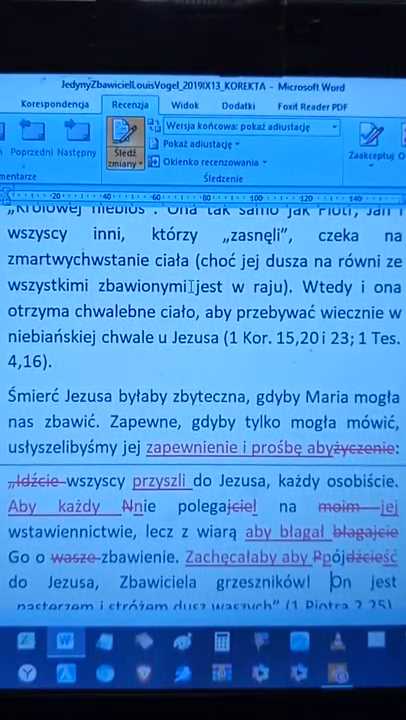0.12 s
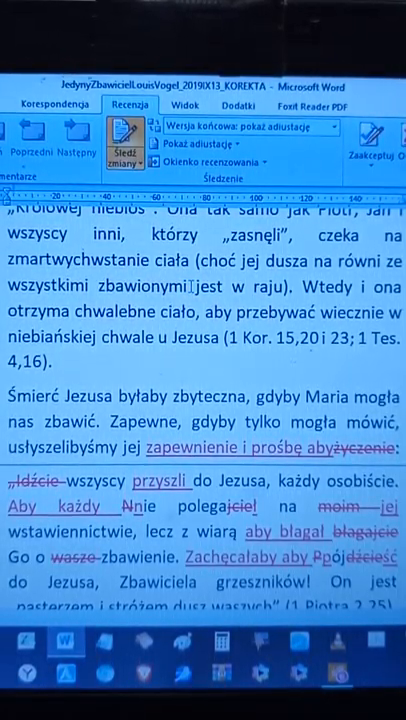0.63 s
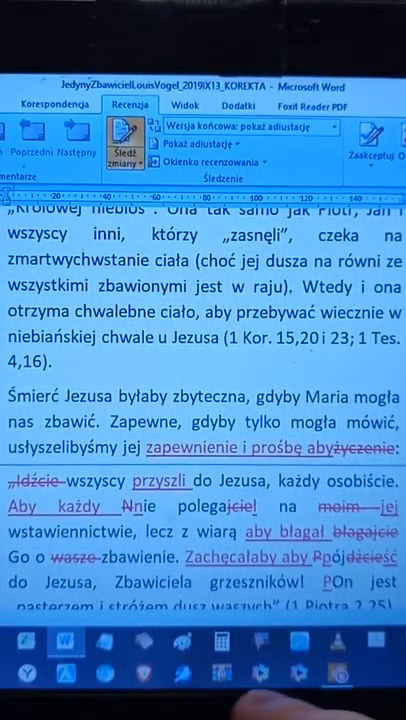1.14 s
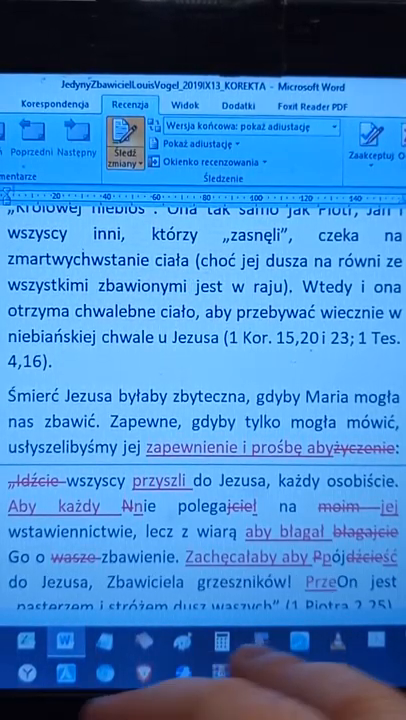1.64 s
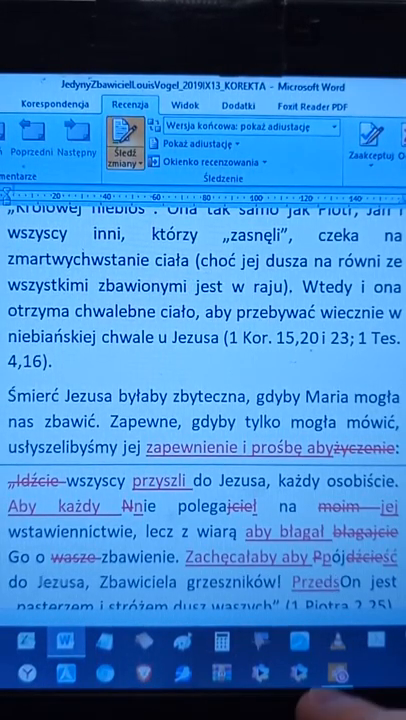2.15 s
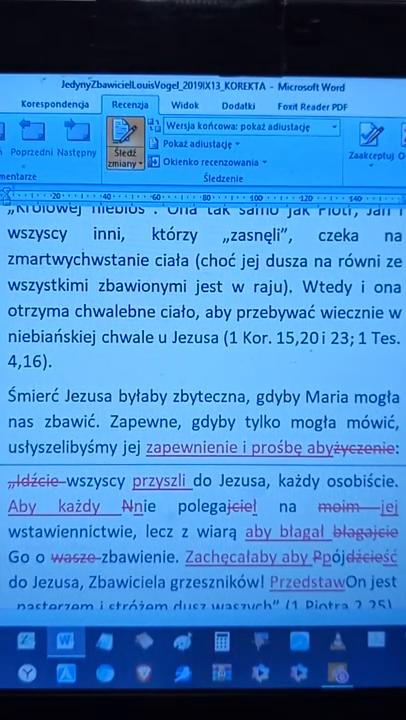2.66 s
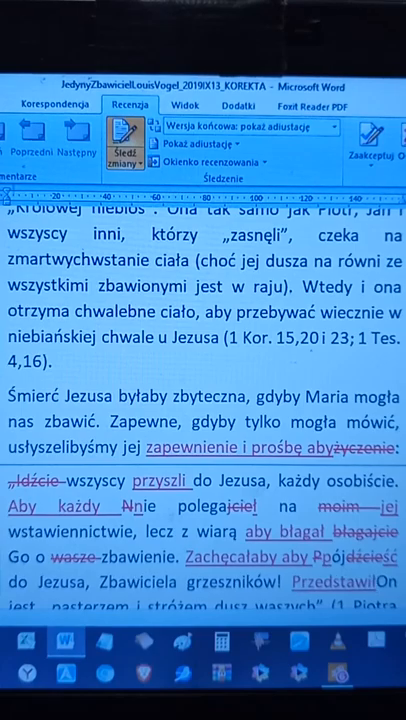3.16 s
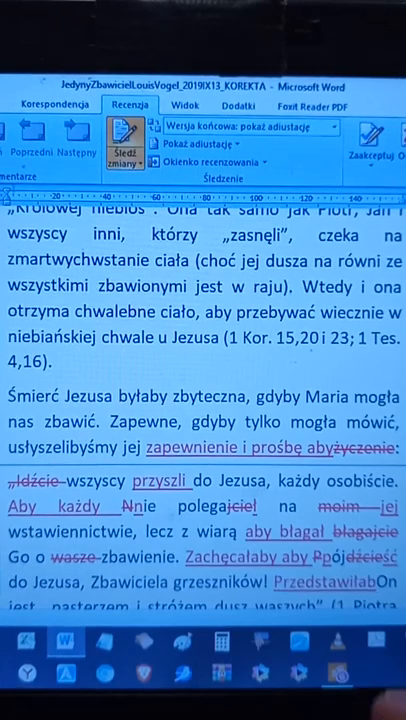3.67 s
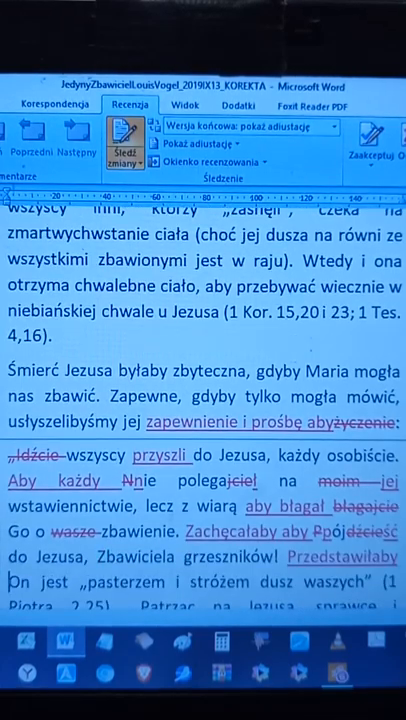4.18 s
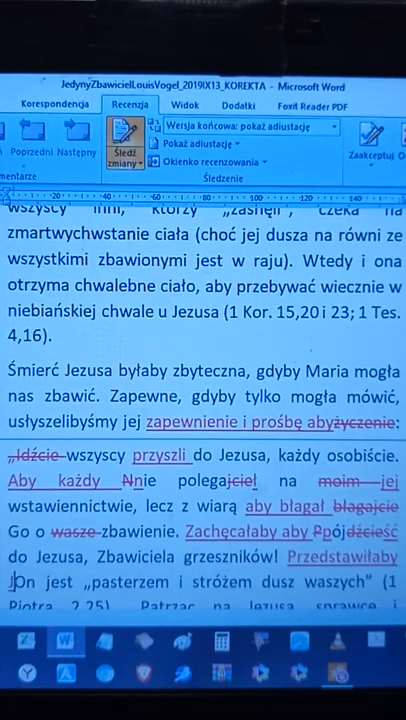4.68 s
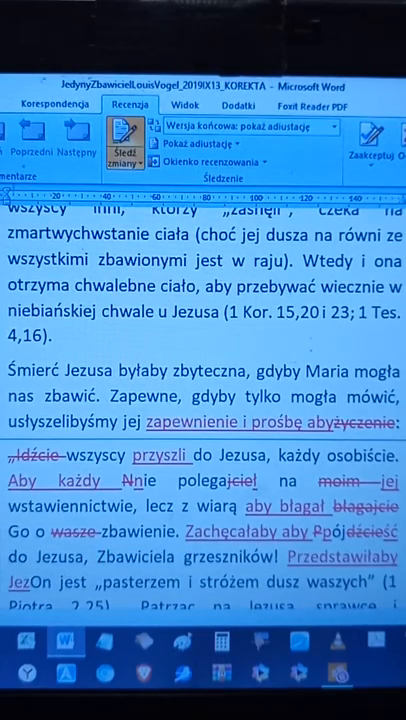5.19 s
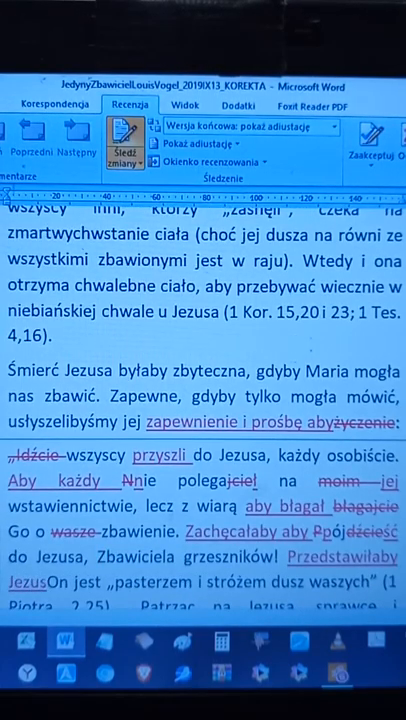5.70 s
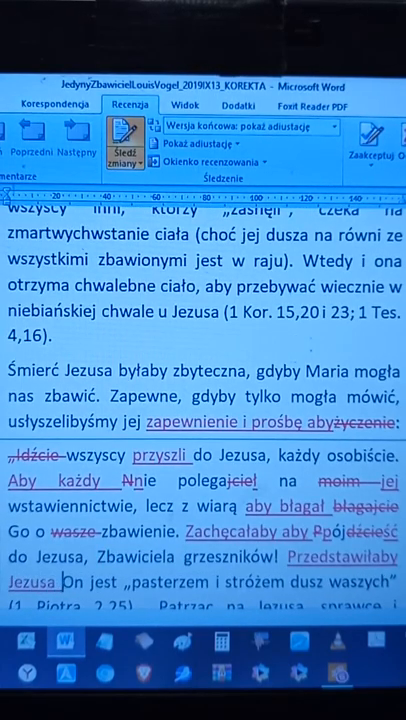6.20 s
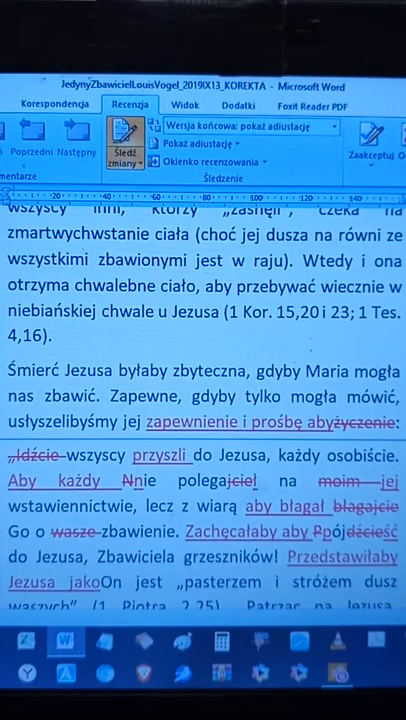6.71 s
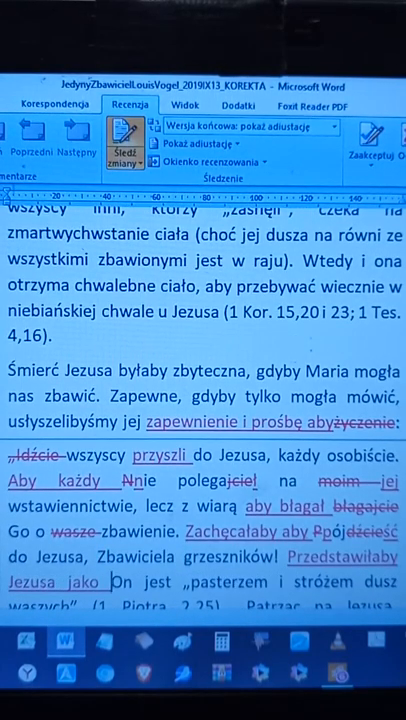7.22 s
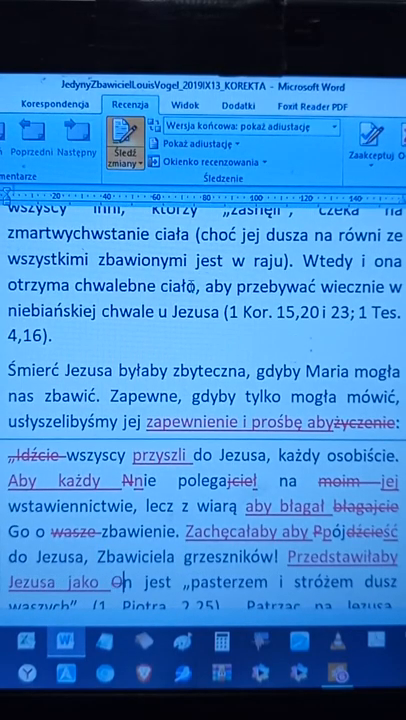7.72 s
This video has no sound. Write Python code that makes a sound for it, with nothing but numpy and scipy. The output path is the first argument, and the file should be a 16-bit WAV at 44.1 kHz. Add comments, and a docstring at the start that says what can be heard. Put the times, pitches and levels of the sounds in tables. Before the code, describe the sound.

Close, dry typing: light, crisp key clicks with dull woody bumps from the case and desk underneath. The rhythm is quick but irregular, with small gaps between strokes and occasional harder snaps. Very little echo, just a short room tail. A faint wavering fan hum and soft hiss stay steady behind it, exposed at the start and again when the typing thins to almost nothing.

```python
"""Fingers type an uneven run on a flat computer keyboard, the microphone on the same desk.
Each key gives short plastic clicks as it is touched, bottoms out and springs back: noise bursts
filtered by keycap resonances. Each push thuds into case and desk, a sum of damped sines, and
buzzes loose keys, noise on the swing of the desk. A fan hums faintly as wavering sines over the
shaped-noise hiss of a quiet room; sparse taps give the clicks a short room tail."""
import sys
import numpy as np
from scipy import signal
from scipy.fft import rfft, irfft
from scipy.io import wavfile
from scipy.ndimage import uniform_filter1d

SR = 44100
rng = np.random.default_rng(int(sys.argv[2]) if len(sys.argv) > 2 else 0)


def transcribe(signal):
    """Save signal, clipped to [-1, 1], as a 16-bit WAV file at the path in sys.argv[1]."""
    frames = np.atleast_2d(signal).T
    limited = np.clip(frames, -1, 1)
    pcm = np.round(limited * 32767).astype(np.int16)
    wavfile.write(sys.argv[1], SR, pcm)


def undo_db(level):
    """Turn decibels back into plain size, where 20 dB means ten times bigger."""
    steps = np.asarray(level, float) / 20
    return 10 ** steps


N = 346626

# Tones of the fan. Each row: frequency in Hz, rms level in dB before waver.
FAN_TONES = [(479, -75), (430, -87)]
# Spectrum of the steady hiss. Each row: frequency in Hz, relative density in dB per Hz.
HISS_SPECTRUM = [(25, -31), (55, -14), (140, -13), (370, -19), (480, -16), (600, -24.5), (1000, -26.5),
                 (3000, -31.5), (6500, -34), (7600, -41.5), (13500, -43.5), (14600, -40.5), (16900, -26),
                 (17200, -70)]
# Key clicks. Each row: start in seconds, relative level in dB, body against middle in dB,
# own ring of this keycap in Hz, length scale of the blow in ms.
CLICKS = [(0.4432, -58, -47, 7400, 0.53), (0.504, -56, -1.5, 7940, 5.6), (0.674, -50, 1, 5850, 8.7),
          (0.6814, -45.5, 14, 2620, 2.2), (0.6938, -51, 3.5, 3480, 0.5), (0.7092, -52.5, 11, 3340, 6),
          (0.7192, -61.5, 5, 3320, 24), (.743, -70, -8, 7000, 2), (0.761, -55.5, -20, 8300, 5.4),
          (0.766, -58.5, 0, 8950, 5.5), (1.224, -52, 3.5, 4100, 1.3), (1.2287, -44, 0.5, 3100, 2.4),
          (1.3147, -61.5, -4, 2660, 2.8), (1.3371, -51.5, 0.5, 6400, 1.7), (1.3508, -52, 7, 1280, 2.8),
          (1.3674, -53, 8, 4030, 3.9), (1.4286, -52, -8, 5370, 4.2), (1.4868, -51, -2, 7850, 1.3),
          (1.4918, -52.5, -8, 7300, 3.3), (1.56, -67.5, 1, 5740, 3), (1.7288, -57.5, -34, 7150, 2.8),
          (1.746, -58.5, -7, 7000, 2.5), (1.8312, -64, 1, 6300, 3.1), (1.9584, -57.5, -5.5, 5900, 1.03),
          (1.983, -65.5, 6, 6950, 2.4), (2.051, -66.5, -25, 6260, 11), (2.089, -44, -8, 6600, 3),
          (2.0941, -46, 11.5, 6500, 3), (2.2467, -51.5, -5, 6250, 0.8), (2.2597, -48.5, 8.5, 4030, 7.2),
          (2.3437, -65, -3, 2450, 7.5), (2.5298, -57.5, -2, 5500, 7.6), (2.544, -66, -6, 3470, 2.8),
          (2.6191, -61, -5, 3470, 0.72), (2.6602, -51, -3, 6500, 6.2), (2.667, -53, 1, 2330, 5.2),
          (2.7354, -53.5, -1, 6300, 4.4), (2.8733, -49.5, -8.5, 5800, 10.3), (2.888, -59, 0, 6500, 3),
          (2.8962, -62, 8, 4610, 6.5), (3.0035, -49, -12, 10400, 2.9), (3.0106, -47, 22, 1770, 1.34),
          (3.086, -64.5, 4, 9100, 2.3), (3.0979, -62, -4, 4330, 1.4), (3.1075, -62, 0, 4300, .9),
          (3.1986, -52.5, -13, 4100, 0.66), (3.212, -52, 1, 4000, 0.91), (3.273, -57.5, -6, 6540, 0.24),
          (3.31, -57, -6, 6800, 0.33), (3.4694, -46, -22, 3800, 4.5), (3.477, -56, -14, 3500, 3.8),
          (3.5463, -58.5, -24, 7100, 3.1), (3.5532, -60, -10, 7200, 5), (3.6831, -49, -1, 3270, 2.8),
          (3.69, -49.5, -8, 3120, 1.8), (3.7771, -37.5, -6, 5200, 4), (3.7832, -31.5, -4, 5600, 2.5),
          (3.798, -55, 5, 3000, 3), (3.854, -69, -17, 8250, 4.1), (3.867, -53, -24, 5970, 9.8),
          (3.8714, -48.5, -11, 5200, 0.83), (4.0407, -53, -32, 7360, 7.9), (4.0493, -54.5, -10, 7950, 3.6),
          (4.2882, -48.5, -6, 5000, 8.7), (4.373, -62, -9, 6050, 0.98), (4.3933, -48, -14, 3700, 5.6),
          (4.6585, -53, -17, 5100, 1.7), (4.6648, -61, 5, 2260, 11), (4.7505, -64.5, 3, 5630, 2),
          (4.7568, -64, 5, 7450, 2.3), (5.029, -48.5, -17, 3570, 2.7), (5.04, -56.5, 0, 6400, 5.4),
          (5.0584, -51, 5, 3120, 2), (5.0738, -54.5, 20, 3040, 3.1), (5.129, -59, 2, 6600, 2),
          (5.4374, -47.5, -4.5, 6230, 4.6), (5.4428, -45.5, 0.5, 6500, 3.3),
          (5.5696, -53.5, -17, 4500, 4.8), (5.5807, -58, 5, 6300, 0.83), (5.599, -62, 10, 3100, 2.8),
          (5.662, -63, -14, 4230, 18), (5.6717, -59.5, 2, 3070, 3.1), (5.7888, -53.5, -1, 6460, 1.5),
          (5.804, -51, 0, 1260, 1.1), (5.809, -65, -9, 5400, 3), (5.8233, -44, -4.5, 6600, 1.8),
          (5.8827, -34.5, -9, 5800, 2.4), (5.8928, -44, -1.5, 6520, 2), (5.969, -68.5, -7, 8000, 1.7),
          (6.001, -52.5, -18, 4530, 4.1), (6.0101, -60, -27, 3580, 2), (6.1655, -44.5, -47, 10800, 0.78),
          (6.173, -57.5, -1, 1630, 6.4), (6.2447, -62.5, 0, 8700, 4.9), (6.302, -47, -16, 6650, 2.9),
          (6.3107, -48, 10, 2940, 3.5), (6.3294, -53.5, 12, 3160, 1.3), (6.398, -45, -13, 3800, 4.1),
          (6.4076, -47.5, 6, 1580, 3.8), (6.479, -63.5, 3, 3970, 2.2), (6.6013, -55.5, -6, 11300, 3.2),
          (6.6079, -48, 5.5, 1180, 2.5), (6.716, -64.5, 2, 3250, 1.5), (6.821, -34, -12, 6500, 3.2),
          (6.8291, -34.5, 4, 6270, 4.8), (6.892, -64, -19, 7200, 1), (6.918, -49, -15, 7660, 3.9),
          (6.9269, -51, -11, 6900, 1.1), (7.279, -71, -6, 5780, 5.4), (7.8329, -61, -13.5, 9700, 1.8),
          (7.846, -65, 7, 8940, 1.8)]
# Centres of the body, middle and edge of a click, in Hz.
CLICK_BANDS_HZ = 1500, 5000, 10000
# Resonances shared by all keys. Each row: centre in Hz, width in Hz, relative level in dB.
KEYCAP_MODES = [(1248, 87, 11.5), (1595, 120, 5), (2300, 73, -6), (3100, 83, -14.5), (3990, 93, -4),
                (5470, 107, -6), (6500, 500, 1), (7310, 280, -11.5), (8440, 720, -17), (9950, 610, -2.5),
                (17300, 1100, -21)]
# Overall colour of a click, resonances included. Each row: frequency in Hz, gain in dB.
RATTLE_COLOUR = [(500, 7), (900, -9.5), (3000, 6), (7000, -1), (12000, -4), (13500, -11), (14500, -6),
                 (17000, 5.5), (18300, -32), (19200, -42)]
# Decay of the room. Each row: frequency in Hz, t60 in seconds.
ROOM_DECAY = [(700, 0.47), (3000, 0.12), (7000, 0.04), (9000, 0.027), (16000, 0.031)]
# Pushes into case and desk. Each row: start in seconds, boom in dB, thud in dB, knock in dB.
PUSHES = [(0.675, -47, -33.5, -45.5), (0.752, -60, -49.5, -56), (0.787, -56.5, -57, -63),
          (1.233, -54, -34, -39.5), (1.318, -48, -42, -57.5), (1.351, -48.5, -35.5, -50),
          (1.42, -47.5, -49.5, -70), (1.497, -51.5, -31.5, -42), (1.555, -51, -38, -68),
          (1.6, -71, -50, -63), (1.742, -52, -42, -74), (1.824, -55, -49.5, -83), (1.98, -60.5, -56, -59),
          (2.053, -56, -52, -68), (2.102, -54, -33, -37.5), (2.178, -52.5, -46, -67),
          (2.262, -53.5, -47.5, -68), (2.343, -58.5, -60.5, -74), (2.537, -50.5, -44.5, -63),
          (2.609, -58.5, -65, -68), (2.668, -52.5, -33.5, -69), (2.736, -53, -50.5, -75),
          (2.889, -46, -41, -54), (3.011, -48.5, -38.5, -42), (3.103, -47.5, -68, -62),
          (3.209, -48, -43, -64), (3.305, -54, -55, -70), (3.351, -65, -73, -65),
          (3.478, -41.5, -35.5, -51), (3.544, -47, -40.5, -68), (3.693, -48, -34, -41),
          (3.783, -43.5, -32, -33), (3.866, -49, -43, -52), (3.942, -65, -58, -81), (4.091, -68, -59, -83),
          (4.296, -46, -32.5, -51.5), (4.369, -52.5, -42.5, -74), (4.671, -48.5, -44.5, -59),
          (4.758, -55.5, -52.5, -80), (5.038, -43.5, -38, -69), (5.446, -51.5, -31.5, -47),
          (5.504, -65, -44, -74), (5.578, -48.5, -41, -57), (5.673, -51, -52, -77), (5.8, -55, -50, -61),
          (5.891, -40, -38, -38), (5.998, -50, -58, -62), (6.172, -45, -40.5, -74),
          (6.245, -54.5, -48, -73), (6.309, -47, -42.5, -47.5), (6.407, -39, -35.5, -42),
          (6.612, -51.5, -43, -57), (6.731, -63, -62, -87), (6.827, -42.5, -32.5, -39.5),
          (6.918, -49.5, -43.5, -55.5), (7.645, -59, -88, -86)]
# Modes of case and desk: boom below 130 Hz, knock above 260 Hz, thud between.
# Each row: frequency in Hz, relative level in dB, t60 in seconds, rise time constant in ms.
DESK_MODES = [(58.4, -9, 0.49, 12), (91.76, 5.5, 0.21, 24), (97.87, 13, 0.22, 5.6), (151.5, 3, 0.13, 3.9),
              (181.95, -1, 0.22, 4.5), (250.2, -2, 0.11, 11.7), (291, 1.5, 0.056, 0.99),
              (353, -3, 0.049, 1.2), (438.3, 1, 0.091, 1.1), (582, -1, 0.054, 2), (667, -10, 0.072, 0.75)]
# Colour of loose keys shaken by a push. Each row: frequency in Hz, gain in dB.
CHATTER_COLOUR = [(600, 10.5), (1200, 3.5), (3200, -3), (4500, -2), (6500, -6.5), (8500, -34), (13500, -30),
                  (16500, 13.5), (17300, -60)]


def evened(x):
    """Scales to rms 1."""
    return x / np.sqrt(np.mean(x ** 2) + 1e-20)


def read(points, hz):
    """Reads a spectrum on a log-frequency axis."""
    f, value = np.transpose(points)
    return np.interp(np.log(hz + 1), np.log(f + 1), value)


def add(mix, start_s, sound):
    """Mixes a sound in at start_s, cut at the end of the mix."""
    part = mix[round(start_s * SR):][:len(sound)]
    part += sound[:len(part)]


def background(hiss_db=-69.5, waver_db=3.0, waver_hz=2.47):
    """Steady hiss of room and microphone, and fan tones that waver in level and pitch."""
    hz = np.fft.rfftfreq(N, 1 / SR)
    hiss = irfft(rfft(rng.standard_normal(N)) * undo_db(read(HISS_SPECTRUM, hz)), N)
    out = undo_db(hiss_db) * evened(hiss)

    def slow_noise():
        """Random drift of rms 1, mostly below 6 Hz."""
        return evened(irfft(rfft(rng.standard_normal(N)) / (1 + (hz / 6) ** 2), N))

    for tone_hz, tone_db in FAN_TONES:
        level_drift, pitch_drift = slow_noise(), slow_noise()
        phase = 2 * np.pi * np.cumsum(tone_hz + waver_hz * pitch_drift) / SR
        out += undo_db(tone_db + waver_db * level_drift) * np.sqrt(2) * np.sin(phase)
    return out


def clicks(own_db=13, own_q=14, shared_db=9, detune=0.059, cap_scatter_db=3.0,
           tail_db=-20, tail_ms=13, lead_db=-27, lead_ms=3,
           edge_db=2, edge_db_per_octave=2, edge_scatter_db=4, scrape_top_hz=9100):
    """A short rattle of plastic on plastic rings the keycap; every click is tuned a little apart."""
    size, early = 4096, 1024  # samples per click, samples ahead of its start
    ms = (np.arange(size) - early) * 1000 / SR
    hz = np.fft.rfftfreq(size, 1 / SR)
    out = np.zeros(N)
    noises = rng.standard_normal((len(CLICKS), size))
    cap_luck = rng.standard_normal((len(CLICKS), len(KEYCAP_MODES), 2))
    edge_luck = rng.standard_normal(len(CLICKS))
    for row, noise, luck, edge_chance in zip(CLICKS, noises, cap_luck, edge_luck):
        start_s, level_db, body_db, ring_hz, length_ms = row
        late = ms / max(length_ms, .3) - .3
        blow = np.exp(-(late / np.where(late < 0, .25, .6)) ** 2)  # rises faster than it falls

        # the key scrapes its guide just before the blow and chatters after it, the heavy ones most
        lead = undo_db(lead_db) * np.exp(ms / lead_ms)
        tail = undo_db(tail_db + 0.34 * body_db) * np.exp(-ms / tail_ms)
        faint = undo_db(-.3 * (level_db + 38.5))  # hard blows stand out further from their scrape
        scrape = faint * np.where(ms < 0, lead, tail)

        ring = undo_db(own_db) / (1 + 2j * own_q * (hz / ring_hz - 1))
        for (mode_hz, width_hz, mode_db), (pitch_chance, level_chance) in zip(KEYCAP_MODES, luck):
            tuned_hz = mode_hz * (1 + detune * pitch_chance)
            gain = undo_db(shared_db + mode_db + cap_scatter_db * level_chance)
            ring = ring + gain / (1 + 2j * (hz - tuned_hz) / width_hz)

        # a cap that rings higher clicks brighter
        octaves = np.log2(ring_hz / CLICK_BANDS_HZ[1])
        bright_db = edge_db + edge_db_per_octave * octaves + edge_scatter_db * edge_chance
        bands = list(zip(CLICK_BANDS_HZ, (body_db, 0, bright_db)))
        colour = undo_db(read(bands, hz) + read(RATTLE_COLOUR, hz))

        blow_part = rfft(noise * blow) * (1 + ring)
        # the scrape is duller than the blow, and rings the cap less against its direct sound
        scrape_part = rfft(noise * scrape) * (undo_db(8) + 1.14 * ring) / (1 + 1j * hz / scrape_top_hz)
        click = irfft(colour * (blow_part + scrape_part))
        add(out, start_s - early / SR, undo_db(level_db - 10) * evened(click))
    return out


def room(x):
    """Sparse taps of random sign, each band dying at its own speed."""
    taps = np.zeros(SR // 4)
    slots = np.arange(120, SR // 4 - 20, 20)  # samples
    taps[slots + rng.integers(0, 20, len(slots))] = rng.choice([-1., 1.], len(slots))
    hz, t, z = signal.stft(taps, SR, nperseg=128)
    decay = undo_db(-60 * t / read(ROOM_DECAY, hz)[:, None])
    tail = signal.istft(z * decay, SR, nperseg=128)[1]
    return signal.fftconvolve(x, tail / np.linalg.norm(tail))[:N]


def thuds(low_detune=0.013, knock_detune=0.052, low_scatter_db=2.5, knock_scatter_db=3.0,
          damped_s=0.35, lean_db_per_db=-0.27, even_thud_db=-45):
    """Each push knocks the case and swings the desk; modes build up, and the feet damp them out."""
    t = np.arange(SR // 2) / SR
    out = np.zeros(N)
    chance = rng.standard_normal((len(PUSHES), len(DESK_MODES), 2))
    fade = np.exp(-(t / damped_s) ** 4)
    for (start_s, boom_db, thud_db, knock_db), luck in zip(PUSHES, chance):
        # the case knocks with the click nearest to 2 ms before the desk swings
        nearest_s = min((row[0] for row in CLICKS), key=lambda s: abs(s - start_s + .002))
        knock_s = nearest_s - .0012
        for (hz, mode_db, t60_s, rise_ms), (pitch_chance, level_chance) in zip(DESK_MODES, luck):
            if hz > 260:
                at_s, drive_db = knock_s, knock_db
                detune, scatter_db = knock_detune, knock_scatter_db
            else:
                at_s, drive_db = start_s, boom_db if hz < 130 else thud_db
                detune, scatter_db = low_detune, low_scatter_db
            if 130 < hz < 165:  # soft pushes favour the lower thud mode
                drive_db += lean_db_per_db * (thud_db - even_thud_db)
            build_up = (1 - np.exp(-1000 * t / rise_ms)) ** 2
            decay = undo_db(drive_db + mode_db + scatter_db * level_chance - 60 * t / t60_s)
            tone = np.sin(2 * np.pi * hz * (1 + detune * pitch_chance) * t)
            add(out, at_s, fade * build_up * decay * tone)
    return out


def chatter(desk, level_db=-24, lumpy_db=3, smooth_ms=6):
    """Neighbouring keys buzz in their guides while the case shakes: lumpy noise on its swing."""
    shake = np.sqrt(abs(uniform_filter1d(desk ** 2, int(smooth_ms * SR / 1000))))
    lumps = evened(uniform_filter1d(rng.standard_normal(N), size=120))
    noise = rng.standard_normal(N) * shake * undo_db(lumpy_db * lumps)
    colour = undo_db(read(CHATTER_COLOUR, np.fft.rfftfreq(N, 1 / SR)))
    buzz = irfft(rfft(noise) * colour, N)
    return undo_db(level_db) * evened(buzz) * np.sqrt(np.mean(desk ** 2))  # level against the desk


def scene():
    """Clicks with their room tail, thuds, chatter and background."""
    keys, desk = clicks(), thuds()
    mix = keys + undo_db(-28) * room(keys) + desk + chatter(desk) + background()
    return mix[None]


def top_cut(x):
    """Nothing passes above the cut-off."""
    return signal.sosfilt(signal.butter(12, 19230, fs=SR, output="sos"), x)


def record(dry):
    """The microphone drops the deepest bass, below 46 Hz."""
    low_cut = signal.butter(2, 46, "high", fs=SR, output="sos")
    mix = signal.sosfilt(low_cut, dry)
    return top_cut(mix)


dry = scene()
out = record(dry)
transcribe(out)
```